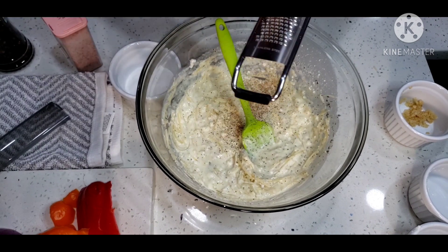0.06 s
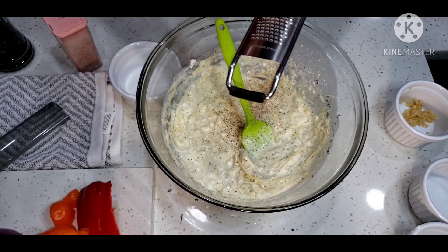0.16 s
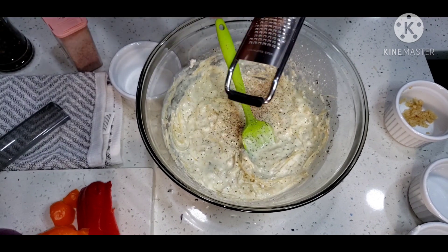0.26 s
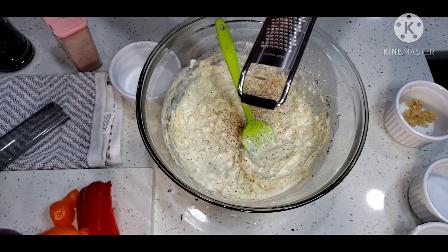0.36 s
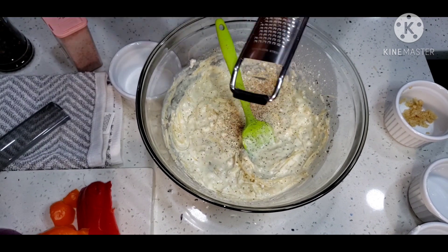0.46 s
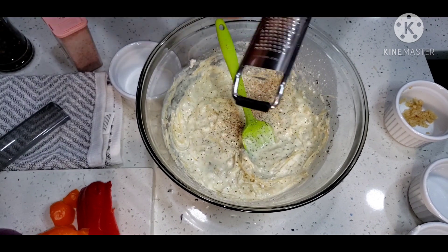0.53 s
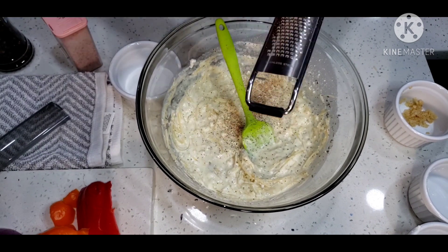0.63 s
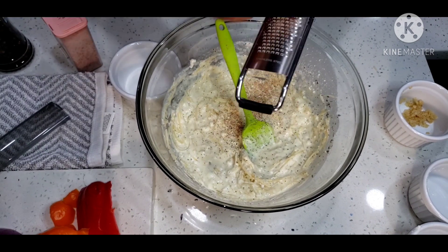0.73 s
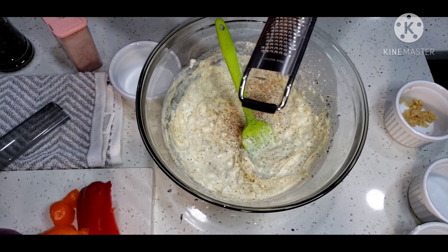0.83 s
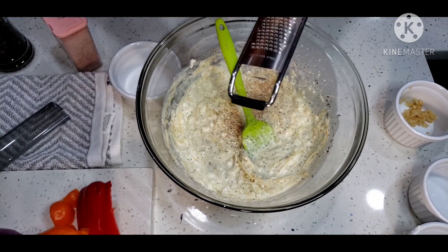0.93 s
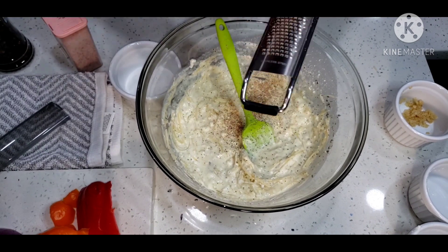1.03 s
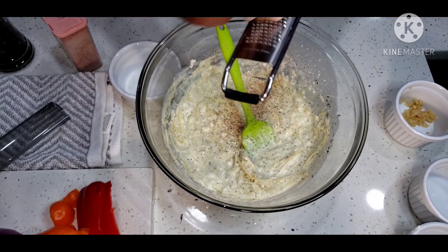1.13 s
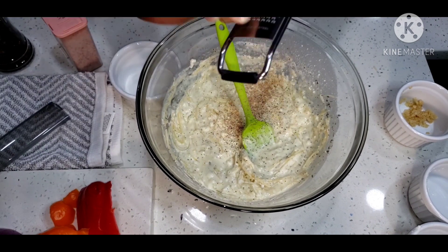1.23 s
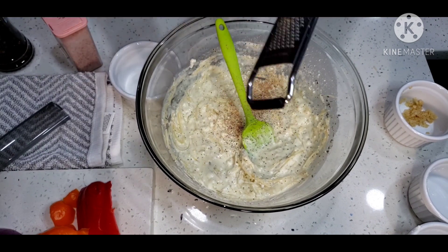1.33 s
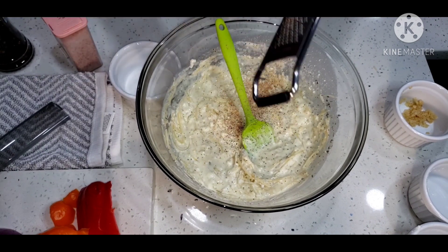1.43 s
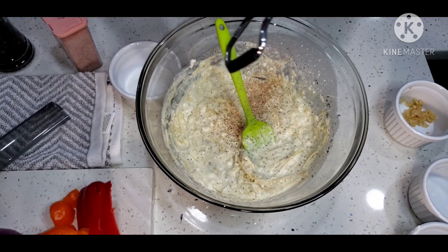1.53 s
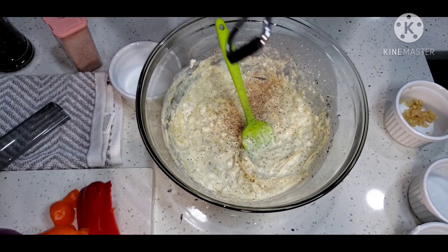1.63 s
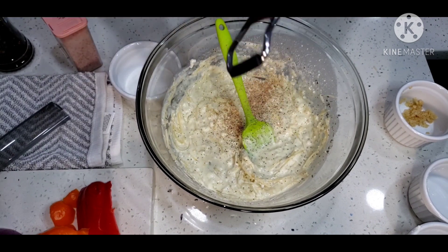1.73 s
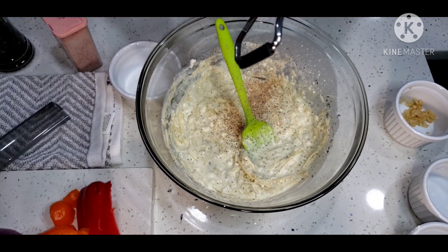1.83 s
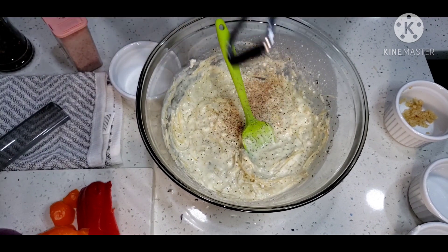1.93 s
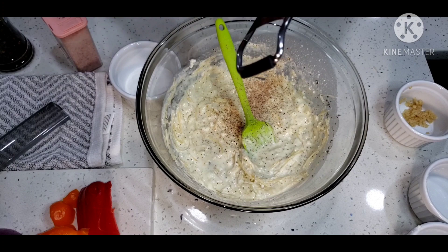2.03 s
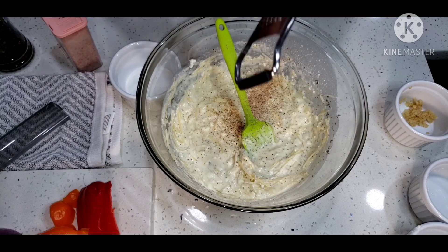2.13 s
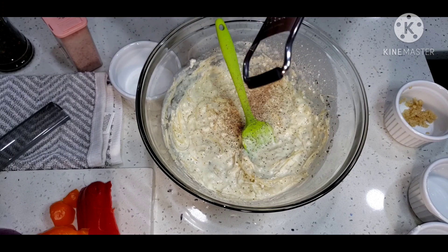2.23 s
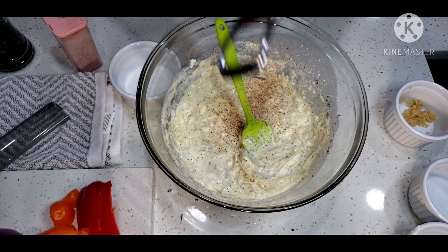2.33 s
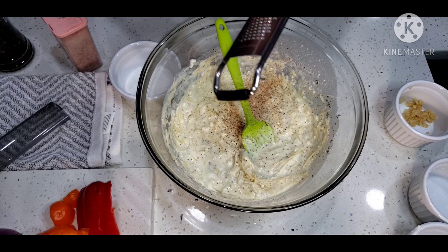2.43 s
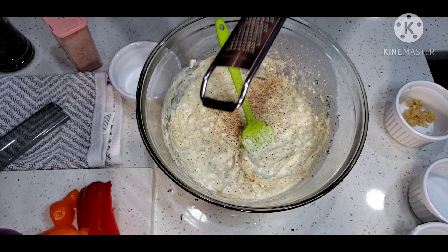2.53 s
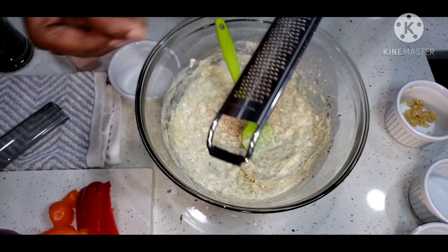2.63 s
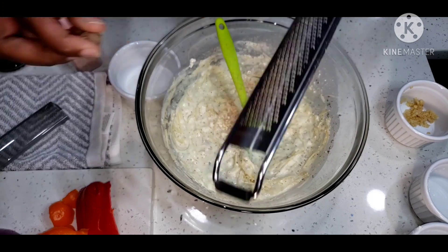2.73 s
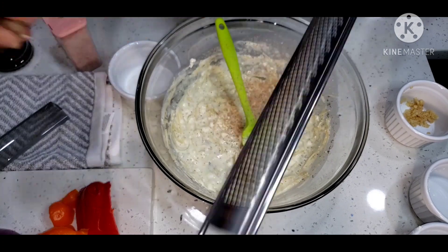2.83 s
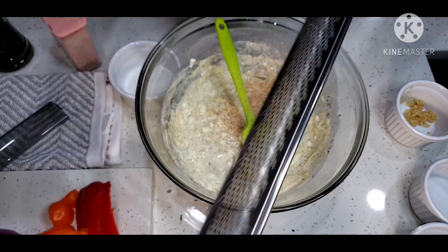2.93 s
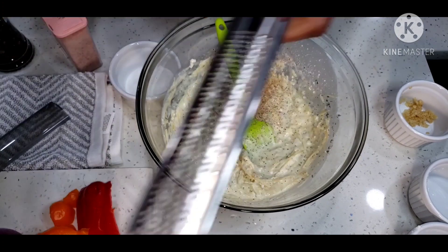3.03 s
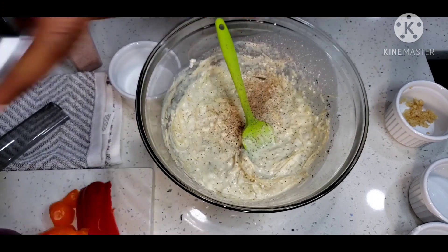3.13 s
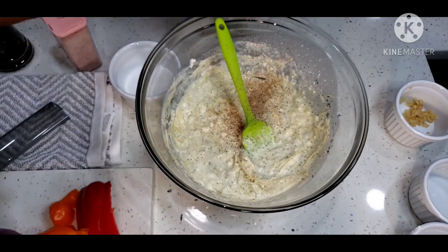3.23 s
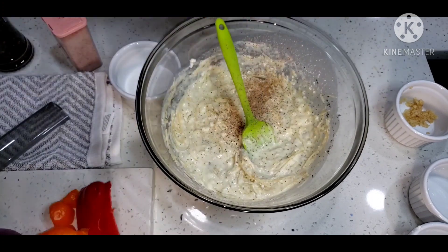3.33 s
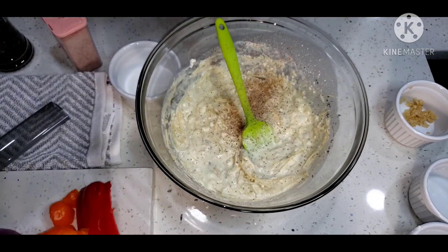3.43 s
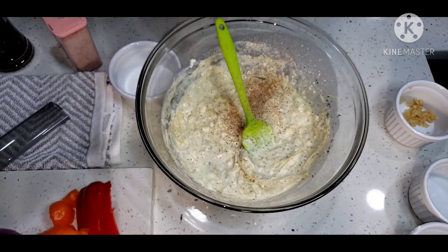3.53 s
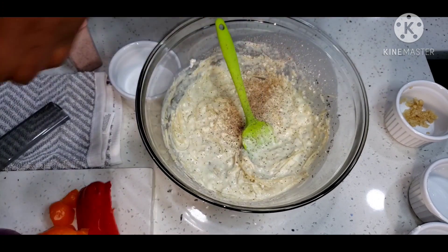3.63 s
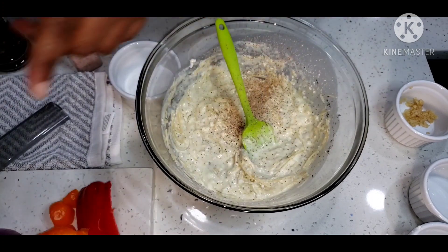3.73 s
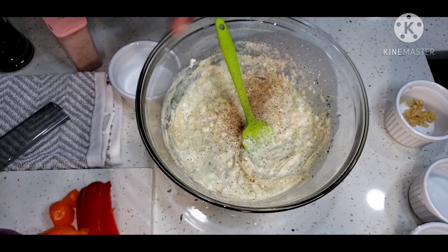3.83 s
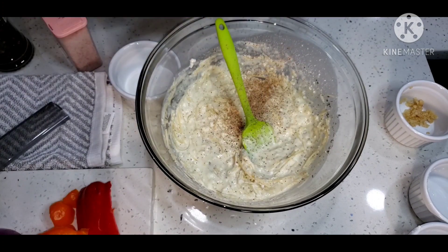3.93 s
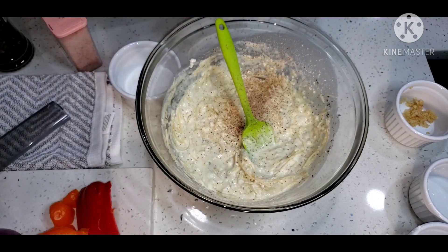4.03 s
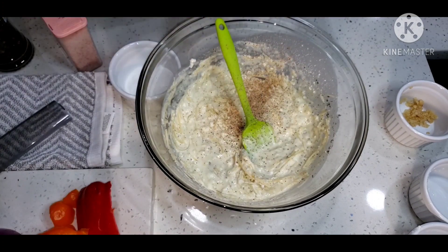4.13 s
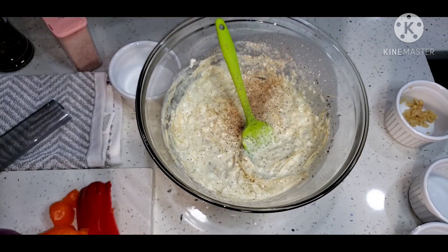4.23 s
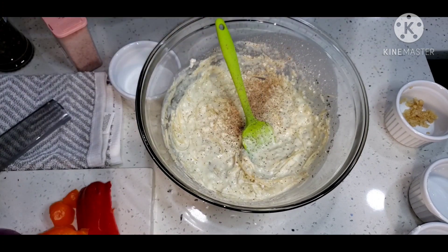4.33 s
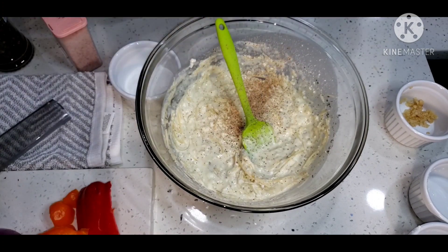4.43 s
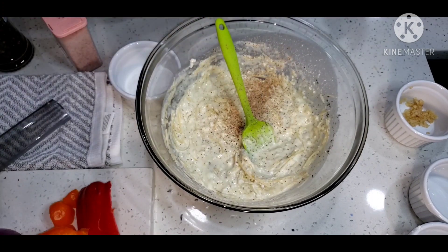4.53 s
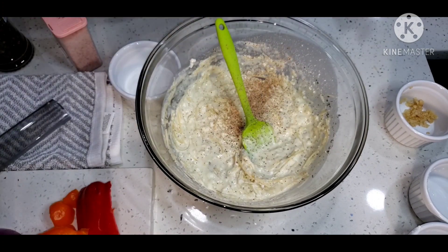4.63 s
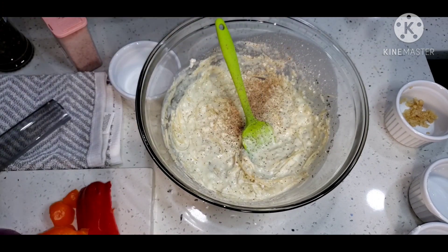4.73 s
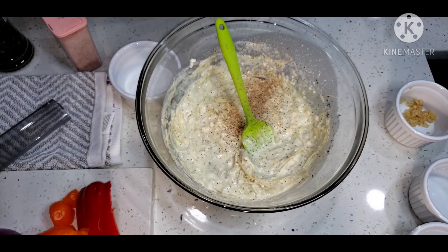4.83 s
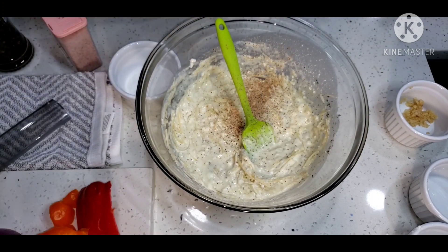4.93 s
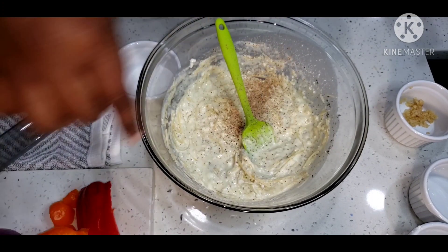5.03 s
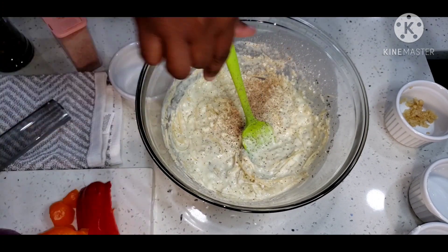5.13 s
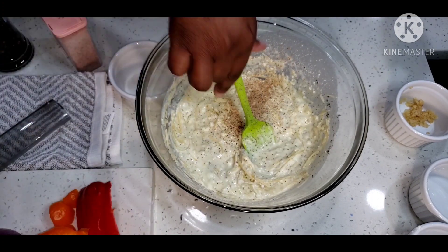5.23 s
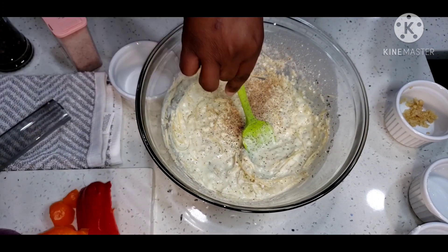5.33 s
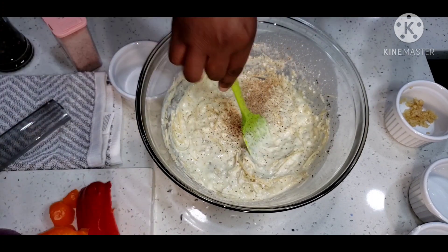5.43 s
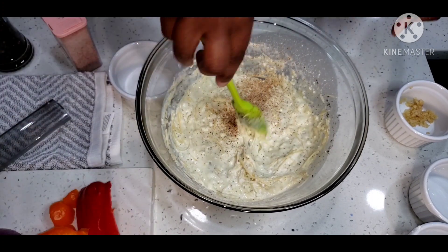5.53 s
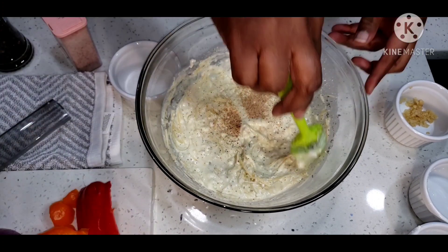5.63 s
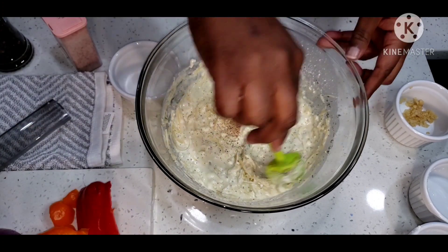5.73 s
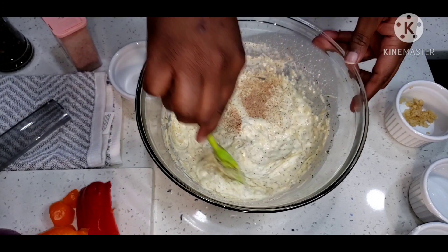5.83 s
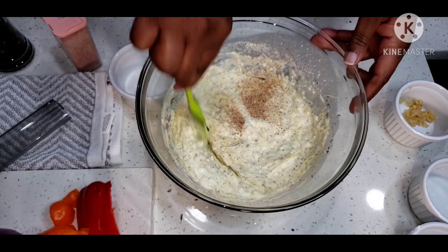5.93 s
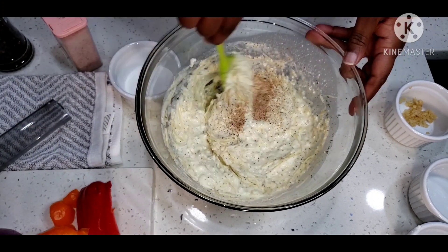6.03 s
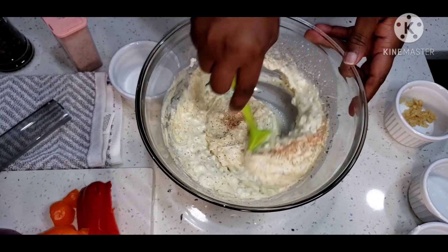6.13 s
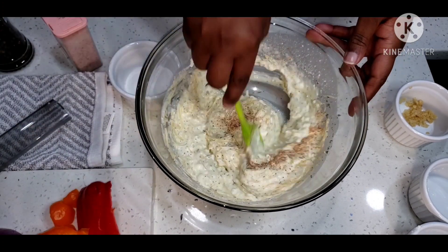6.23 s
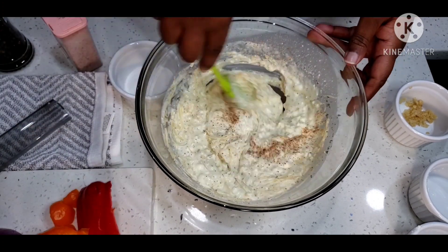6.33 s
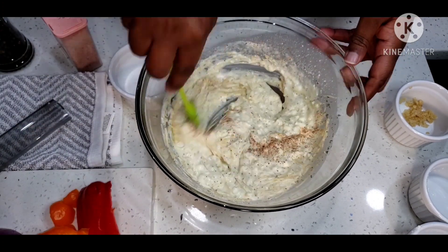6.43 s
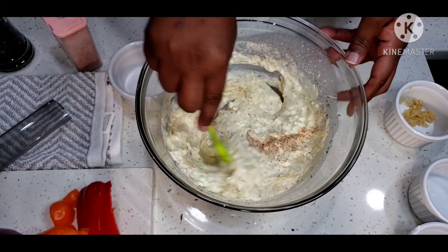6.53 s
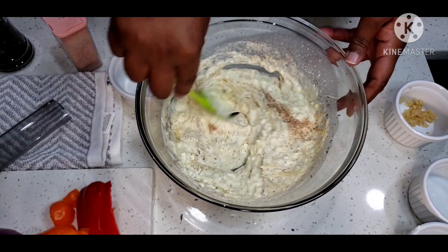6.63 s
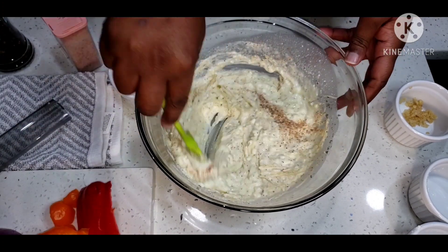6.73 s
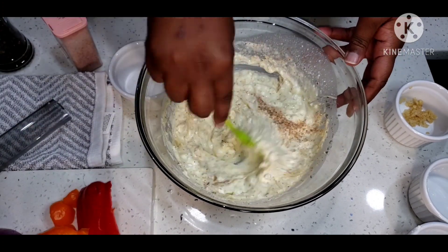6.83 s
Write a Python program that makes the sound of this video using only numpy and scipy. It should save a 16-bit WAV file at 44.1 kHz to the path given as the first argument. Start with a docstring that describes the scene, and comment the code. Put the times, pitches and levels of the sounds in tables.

```python
"""In a small hard kitchen where a fridge hums, a hard spice is rasped on a steel grater over a bowl.
The grater is tapped clean and dropped on a stone counter to the left, where it chatters and settles.
Then a spatula clicks and drags through batter. Rubbing is made of random tiny impacts, blows of noise
bursts that make the blade ring, clicks of short tones with a crack, and the hum of coloured noise."""
import sys
import numpy as np
from scipy import signal
from scipy.fft import rfft, irfft
from scipy.io import wavfile
from scipy.ndimage import uniform_filter1d

SR = 44100
rng = np.random.default_rng(int(sys.argv[2]) if len(sys.argv) > 2 else 0)


def put_to_file(sound):
    """Save the sound as 16-bit audio at rate SR, in the file named by the first command-line argument."""
    columns = np.atleast_2d(sound).T  # one column per channel
    safe = np.clip(columns, -1, 1)
    whole_steps = np.round(safe * 32767)
    wavfile.write(sys.argv[1], SR, whole_steps.astype(np.int16))


N = 303041

# Ringing modes of the blade while hand and spice damp it; levels are relative.
# Columns: pitch_hz [Hz], width_hz [Hz], level_db [dB]
DAMPED_MODES = [(418, 103, -2), (1164, 84, 3.5), (2133, 61, 8), (2790, 410, 3), (3460, 170, -4.5),
                (4670, 64, 1), (5830, 61, 8.5), (6404, 190, 7), (7450, 530, 1), (8550, 490, -2),
                (9750, 680, 0), (11200, 480, -4), (12300, 220, 0.5), (13440, 260, -1.5), (14360, 300, -2)]
PATCH = 4096  # samples set aside for each short burst, knock or click


def undb(db):
    """Turn decibels into a plain gain."""
    return 10 ** (np.asarray(db) / 20)


def unit(x):
    """Scale to unit energy along time."""
    return x / np.sqrt(np.sum(x ** 2, axis=-1, keepdims=True))


def sides(pan_db):
    """Left and right gains that differ by pan_db; positive leans left."""
    return undb(np.array([pan_db, -pan_db]) / 2)


def band(x, lo_hz, hi_hz):
    """Keep the sound between two pitches."""
    return signal.sosfilt(signal.butter(2, [lo_hz, hi_hz], "band", fs=SR, output="sos"), x)


def peak(x, hz, width_hz):
    """Let one mode ring: the wider its peak, the sooner it dies."""
    return signal.lfilter(*signal.iirpeak(hz, hz / width_hz, fs=SR), x)


def through(x, response):
    """Pass a sound through a body or room, given its answer to a single impact."""
    return signal.fftconvolve(x, response, axes=-1)[..., :N]


def colour(points, size=2048):
    """Short answer to an impact whose loudness over pitch follows (Hz, dB) points."""
    hz, db = np.transpose(points)
    grid_hz = np.arange(size + 1) * SR / 2 / size + 1
    curve_db = np.interp(np.log(grid_hz), np.log(hz), db)
    # folding the cepstrum forward puts the energy as early as possible
    cepstrum = irfft(np.log(undb(curve_db)))
    cepstrum[1:size] *= 2
    cepstrum[size + 1:] = 0
    return unit(irfft(np.exp(rfft(cepstrum)))[:size])


def body(points, modes, ring_db):
    """Answer to a blow, one for each side: a broad crack plus dying modes with their own phase on each side."""
    t = np.arange(SR // 2) / SR
    ring = 0
    for hz, db, t60 in modes:
        tone = np.sin(2 * np.pi * (hz * t + rng.random((2, 1))))
        ring = ring + undb(db - 60 * t / t60) / np.sqrt(t60) * tone
    out = undb(ring_db) * unit(ring)
    out[:, :2048] += colour(points)
    return unit(out)


def alike(shape):
    """Two noises under one envelope that agree most in the bass and differ in the treble."""
    alike_hz, own_bass = 2004, 0.68  # own_bass: share of separate noise left in the bass
    both = shape * rng.standard_normal(len(shape))
    own = shape * rng.standard_normal((2, len(shape)))
    low = signal.butter(1, alike_hz, fs=SR)
    bass = signal.lfilter(*low, both + own_bass * own)
    treble = own - signal.lfilter(*low, own)
    return bass + treble


def grains(gain, per_s, scatter_db):
    """Random one-sample impacts of spread but bounded size, each with its own random strength on each side."""
    size = np.minimum(rng.exponential(size=N), 3)
    impacts = (rng.random(N) < per_s / SR) * undb(scatter_db * size)
    return alike(gain * impacts / np.sqrt(np.mean(impacts ** 2)))


def tilt(x, low_db, top_db):
    """Raise or lower what lies under 3 kHz and over 9 kHz."""
    low = signal.lfilter(*signal.butter(2, 3000, fs=SR), x * (undb(low_db) - 1))
    top = signal.lfilter(*signal.butter(1, 9000, "high", fs=SR), x * (undb(top_db) - 1))
    return x + low + top


def hits(table):
    """Each contact is a short burst of noise; a longer contact dies more slowly."""
    out, t = np.zeros((2, N)), np.arange(PATCH) / SR
    for s, db, low_db, top_db, pan_db, contact, *_ in table:
        shape = np.exp(-2 * t / contact) * (1 - np.exp(-t / 0.002))
        burst = tilt(alike(shape), low_db, top_db)
        start = int(s * SR)
        out[:, start:start + PATCH] += undb(db) * sides(pan_db)[:, None] * burst
    return out


def wander(hz):
    """Random drift with spread 1, mostly between a third of hz and hz."""
    return unit(band(rng.standard_normal(N), hz / 3, hz)) * np.sqrt(N)


def swells(table):
    """One row of gain for each swell, with straight slopes in dB; also the time since its peak."""
    s, db, rise, fall = np.array(table)[:, :4].T[..., None]
    age = np.arange(N) / SR - s
    slope_db = 20 * np.where(age < 0, -age / rise, age / fall)
    return undb(db - slope_db), np.maximum(age, 0)


def placed(x, lag):
    """Delay the left by lag samples, or the right if lag is negative: sound reaches the nearer side first."""
    return np.array([np.roll(x[0], max(lag, 0)), np.roll(x[1], max(-lag, 0))])


def hum():
    """The fridge: broad noise with a few narrower, whistling bands."""
    # Colour of the broad noise; columns: pitch_hz [Hz], level_db [dB per Hz, relative]
    hum_colour = [(25, -8), (60, -0.5), (125, -0.5), (250, -7), (500, -9.5), (1000, -13.5), (1700, -18),
                  (1900, -27.5), (3500, -22), (6300, -16), (7600, -11.5), (8200, -21.5), (10000, -11.5),
                  (13000, -15.5), (16000, -16)]
    # Whistling bands; columns: pitch_hz [Hz], width_hz [Hz], level_db [dB, relative]
    whistles = [(1140, 56, 2.5), (1520, 50, 2.5), (7230, 150, -6), (9800, 550, -3), (10600, 120, -1)]
    level_db, pan_db = -65.5, 3.5
    noise = alike(np.ones(N))
    out = through(noise, colour(hum_colour)[None])
    for hz, width, db in whistles:
        out = out + undb(db) * peak(noise, hz, width)
    return out * undb(level_db) * sides(pan_db)[:, None]


def tail():
    """The room's answer builds up within a few ms and dies sooner in the treble."""
    # How fast each band dies; columns: pitch_hz [Hz], t60_s [s to fall 60 dB]
    room_bands = [(250, 0.67), (1000, 0.49), (4000, 0.38), (12000, 0.2)]
    t = np.arange(SR // 2) / SR
    out = 0
    for hz, t60 in room_bands:
        noise = band(rng.standard_normal((2, len(t))), hz / 2, min(hz * 2, 20000))
        out = out + noise * undb(-60 * t / t60)
    return unit(out * (1 - np.exp(-t / 0.00049)))


def spatula():
    """Short damped clicks with a broad crack, over a wet grainy drag and dull rubbing on the bowl."""
    # Small clicks of the settling blade, spatula and batter; levels are relative. Columns: start_s [s],
    # level_db [dB], pitch_hz [Hz], ring_s [s to fall 60 dB], left_minus_right_db [dB], crack_db [dB]
    clicks = [(3.25, -52.5, 520, 0.012, 18, -4), (3.297, -48, 2950, 0.0076, 16, 4),
              (3.332, -52.5, 6450, 0.0068, 7, 9), (3.352, -49, 6930, 0.0083, 8, 1),
              (3.394, -50.5, 2280, 0.034, 13, 4.5), (4.011, -34, 2690, 0.0088, 13, -9),
              (4.031, -31.5, 2280, 0.012, 12, -5), (4.732, -51.5, 760, 0.022, 19, -7),
              (4.762, -47, 3430, 0.01, 16, -10), (4.776, -49, 4000, 0.018, 14, -7),
              (5.353, -55.5, 950, 0.014, 10.5, -3), (5.384, -51, 980, 0.015, 9.5, -22),
              (5.88, -50, 960, 0.02, 12.5, -0.5), (5.947, -48, 970, 0.0087, 9, 1),
              (5.962, -50, 2200, 0.0067, 13, -4), (5.974, -51, 573, 0.011, -1, 8),
              (6.015, -56, 732, 0.0058, 6, 16.5), (6.065, -56, 2000, 0.005, 6, 5),
              (6.117, -51.5, 9800, 0.006, 7, 3.5), (6.131, -46, 4850, 0.015, 8, -7),
              (6.001, -55, 1200, 0.008, 7, 4), (6.354, -33, 1470, 0.012, 11, -11),
              (6.371, -47, 1730, 0.027, 6, 4.5), (6.493, -32, 2640, 0.0029, 9.5, 7),
              (6.533, -33, 2620, 0.0055, 3, 0), (6.577, -47, 1560, 0.023, 11, 4),
              (6.621, -45, 602, 0.068, 13.5, -11), (6.643, -39, 1100, 0.01, 12, -8),
              (6.654, -39, 6500, 0.0069, 12, 2), (6.665, -47, 563, 0.014, 8, -13),
              (6.691, -47.5, 668, 0.014, 6, 8), (6.799, -31, 6940, 0.008, 11.5, -3),
              (6.861, -33, 655, 0.04, 6, -16), (6.862, -38, 1540, 0.03, 10, -20)]
    # The spatula bites and drags on; rise and fall span 20 dB, levels are relative.
    # Columns: peak_s [s], grit_db [dB], rise_s [s], fall_s [s], rub_db [dB]
    drags = [(5.37, -80, 0.03, 0.3, -62.5), (5.886, -65, 0.015, 0.32, -55), (6.01, -58.5, 0.27, 0.35, -74),
             (6.118, -62.5, 0.028, 0.2, -77), (6.364, -52.5, 0.054, 0.19, -65.5),
             (6.493, -39.5, 0.014, 0.086, -53.5), (6.645, -53, 0.076, 0.23, -54.5),
             (6.799, -49, 0.0073, 0.039, -53), (6.83, -54.5, 0.039, 0.22, -63)]
    drag_pan_db, rub_scatter_db, attack_s = 4, 4, 0.00014
    out, t = np.zeros((2, N + PATCH)), np.arange(PATCH) / SR
    for s, db, hz, ring, pan_db, crack_db in clicks:
        crack = undb(crack_db) * band(alike(np.exp(-t / 0.0017)), 2230, 21000)
        tone = undb(-60 * t / ring) * np.sin(2 * np.pi * hz * t)
        click = (tone + crack) * (1 - np.exp(-t / attack_s))
        start = int(s * SR)
        out[:, start:start + PATCH] += undb(db) * sides(pan_db)[:, None] * click
    each, _ = swells(drags)
    _, grit_db, _, _, rub_db = np.array(drags).T
    grit_gain, rub_gain = each.sum(0), undb(rub_db - grit_db) @ each
    grit = undb(-3.0) * band(grains(grit_gain, 2200, 4), 2300, 20000)
    dull = band(grains(rub_gain, 2000, rub_scatter_db), 300, 1520)
    rub = undb(9.5) * band(dull, 300, 1520)  # filtered twice for steeper edges
    return band(out[:, :N], 520, 19000) + sides(drag_pan_db)[:, None] * (grit + rub)


def taps():
    """A fingertip knocks the dust off the held blade; a short knock has the pitch of the spot that is hit."""
    # Finger taps; levels are relative. Columns: start_s [s], level_db [dB], low_db [dB], top_db [dB],
    # left_minus_right_db [dB], contact_s [s], knock_hz [Hz], knock_db [dB]
    finger_taps = [(1.5092, -24.5, -13, -2, 4.5, 0.019, 2090, -42),
                   (1.718, -22.5, -16, -1.5, 4.5, 0.013, 2000, -37),
                   (1.928, -31, -3, -3.5, 6.5, 0.009, 1150, -50),
                   (2.139, -32, -1, 0.5, 5.5, 0.013, 1210, -39),
                   (2.359, -26.5, -1.5, 3.5, 5.5, 0.0083, 1285, -30.5)]
    # Colour of the crack; columns: pitch_hz [Hz], level_db [dB per Hz, relative]
    tap_colour = [(120, -46), (200, -25), (480, -22.5), (909, -6), (2010, -4.5), (2860, -7), (3190, -4.5),
                  (5350, -5), (6320, 2.5), (8180, -2), (13700, 7.5), (15600, 4.5), (16500, -30)]
    ring_db, knock_t60_s = -19, 0.015
    # a mode's width sets how long it rings
    modes = [(hz, db, np.log(1000) / np.pi / width) for hz, width, db in DAMPED_MODES]
    out = undb(3.0) * through(hits(finger_taps), body(tap_colour, modes, ring_db))
    t = np.arange(PATCH) / SR
    for s, _, _, _, pan_db, _, hz, db in finger_taps:
        shape = undb(db - 60 * t / knock_t60_s) * (1 - np.exp(-t / 0.0018))
        knock = shape * np.sin(2 * np.pi * hz * t)
        start = int(s * SR)
        out[:, start:start + PATCH] += sides(pan_db)[:, None] * knock
    return out


def counter():
    """Blows, brushes and slides make the free blade ring as it chatters unevenly against the stone."""
    # Blows of the blade on the counter; levels are relative. Columns: start_s [s], level_db [dB],
    # low_db [dB], top_db [dB], left_minus_right_db [dB], contact_s [s]
    blows = [(3.7454, -12.5, 2.5, 18, 6.5, 0.0043), (3.7514, -22, -18, -34, 8, 0.0036),
             (3.8008, -7, -2, -17, 3.4, 0.0026), (4.0464, -31.5, -13, -25.5, 9.9, 0.004),
             (4.0741, -34.5, -6, -23, 11, 0.008), (4.0834, -49, -20, -24, 7.4, 0.0042),
             (4.2383, -10.5, -1.5, 3, 21, 0.0051), (4.2894, -2, -30, -19, 9, 0.0026),
             (4.3335, -8.5, -25, -20, 5, 0.0041), (4.6344, -52.5, 8.5, -17, 29, 0.0084)]
    # The blade brushes, chatters and slides; rise and fall span 20 dB, levels are relative.
    # Columns: peak_s [s], level_db [dB], rise_s [s], fall_s [s], low_db [dB], top_db [dB]
    slides = [(3.027, -60, 0.027, 0.037, -13, 23), (3.09, -63, 0.041, 0.22, -2, -2.5),
              (3.296, -59, 0.06, 0.15, -2.5, -2), (3.41, -64.5, 0.045, 0.32, 1.5, 6.5),
              (3.751, -26.5, 0.0034, 0.035, 5, 13), (3.804, -30.5, 0.006, 0.022, 9, 4),
              (3.83, -43.5, 0.042, 0.14, 5, 1), (4.08, -52, 0.12, 0.039, 16, -9),
              (4.244, -22.5, 0.003, 0.083, 1, -5), (4.354, -31.5, 0.081, 0.048, 4, -28),
              (4.43, -69, 0.03, 0.3, 20.5, -14), (4.62, -54.5, 0.015, 0.11, 4, -3),
              (4.763, -61, 0.033, 0.078, 9.5, -12), (4.89, -70.5, 0.11, 0.067, 8, 19.5)]
    # Colour of the crack; columns: pitch_hz [Hz], level_db [dB per Hz, relative]
    blow_colour = [(59, -45), (100, -23.5), (230, -21.5), (437, -22), (761, -4), (903, -14.5), (1440, -15),
                   (2570, -12), (3320, -15), (4120, -15.5), (6310, -6), (7980, -14.5), (13900, -11),
                   (15500, -20.5), (16500, -78.5)]
    # Modes of the free blade; columns: pitch_hz [Hz], level_db [dB, relative], t60_s [s to fall 60 dB]
    free_modes = [(664.9, 2, 0.48), (704, -3, .1), (748, 0.5, 0.081), (812, -3, 0.087), (870, -9, 0.04),
                  (1016, -1.5, 0.061), (1067, -11, 0.068), (1206, -17, .08), (2998, 1.5, 0.11),
                  (3275, 2.5, 0.06), (3444, 5, 0.07), (4040, -13, 0.058), (5020, 3.5, .035),
                  (5665, -14, .12), (5915, -2, 0.17), (6450, 6.5, 0.063), (6535, -14, .15), (6900, 7, 0.13),
                  (7450, 4, 0.024), (9000, 6, 0.0817), (10020, 5.5, 0.057)]
    ring_db, slide_pan_db = -6, 7.5
    chatter_hz, chatter_depth, chatter_scatter_db = 75, 0.41, 2  # the rate is an average
    dulling_db_per_s = 56  # treble lost as a slide dies
    each, age = swells(slides)
    gain = each.sum(0)
    share = each / (gain + 1e-12)  # how much each slide counts at each moment
    _, _, _, _, slide_low_db, slide_top_db = np.array(slides).T
    low_db = slide_low_db @ share
    top_db = slide_top_db @ share - dulling_db_per_s * (share * age).sum(0)
    wobble = uniform_filter1d(rng.standard_normal(N), size=900) * 30  # spread 1
    phase = np.cumsum(chatter_hz * (1 + 0.21 * wobble)) / SR % 1
    pulse = 1 - chatter_depth + 2 * chatter_depth * np.exp(-phase / 0.071)
    chatter = grains(gain * pulse, 6000, chatter_scatter_db)
    slide = undb(2.5) * sides(slide_pan_db)[:, None] * tilt(chatter, low_db, top_db)
    return through(slide + undb(-4) * hits(blows), body(blow_colour, free_modes, ring_db))


def pressure():
    """Each stroke is an arch: slow at the turns, hardest near the middle."""
    # Strokes, in turn a light pull back and a hard push.
    # Columns: start_s [s], length_s [s], level_db [dB, relative]
    strokes = [(-0.03, 0.17, -37.5), (0.131, 0.14, -28.5), (0.245, 0.12, -38), (0.371, 0.13, -28.5),
               (0.49, 0.12, -34.5), (0.608, 0.14, -28.5), (0.736, 0.14, -39), (0.863, 0.14, -29),
               (0.98, 0.13, -40.5), (1.097, 0.18, -28)]
    arch_power, arch_lean = 1.97, 0.99  # how pointed the arch is; how late its top comes
    contact_db = -56.5  # spice resting on the teeth, until the last stroke ends
    t, gain = np.arange(N) / SR, 0
    for s, length, db in strokes:
        progress = np.clip((t - s) / length, 0, 1)
        gain = gain + undb(db) * np.abs(np.sin(np.pi * progress ** arch_lean)) ** arch_power
    return gain + undb(contact_db) * (t < s + length)


def rasp():
    """Thousands of teeth a second bite the spice; the spot that it touches decides which blade modes ring."""
    # Colour of the bites; columns: pitch_hz [Hz], level_db [dB per Hz, relative]
    rasp_colour = [(47, -29), (80, -24.5), (261, -24.5), (426, -22.5), (972, -21), (1160, -15.5),
                   (1740, -14), (2120, -15), (2320, -18.5), (4050, -6), (6050, -1), (8080, -5.5),
                   (14100, 6), (15400, 4.5), (16500, -48)]
    teeth_per_s, tooth_scatter_db, pan_db = 7000, 1.6, 3.5
    catch_hz, catch_db = 220, 1.5  # rows of teeth catch and let go
    spot_hz, spot_db = 14, 3  # how fast and how far each mode's drive changes as the spice travels
    body_db, body_slope = 5.5, 0.15  # low body on a hard push; dB gained per dB of lighter pressure
    gain = pressure()
    low_db = body_db - body_slope * 20 * np.log10(gain / gain.max() + 1e-3)
    teeth = grains(gain * undb(catch_db * wander(catch_hz)), teeth_per_s, tooth_scatter_db)
    teeth = through(tilt(teeth, low_db, 0), colour(rasp_colour)[None])
    ring = 0
    for hz, width, db in DAMPED_MODES:
        drive = teeth * undb(db + spot_db * wander(spot_hz))
        ring = ring + peak(drive, hz, width)
    return undb(-3.0) * sides(pan_db)[:, None] * (teeth + ring)


def scene():
    """Place the sources, let the room answer each in its own share, and add the hum."""
    # each source with the samples by which left lags right, and its room share in dB
    parts = [(hum_free, lag, room_db) for hum_free, lag, room_db in (
        (rasp(), 3, -8), (taps(), 3, -3), (counter(), -15, -7.5),
        (spatula(), 3, -11))]  # the spatula is near, so it has the least room
    direct, to_room = 0, 0
    for sound, lag, room_db in parts:
        source = placed(sound, lag)
        direct = direct + source
        to_room = to_room + undb(room_db) * source
    return direct + through(to_room, tail()) + hum()


def record(dry):
    """The deepest bass is lost; the top is shelved down, then cut."""
    shelf_hz, top_hz = 15500, 16750
    soft = signal.sosfilt(signal.butter(2, 40, "high", fs=SR, output="sos"), dry)
    soft = signal.sosfilt(signal.ellip(6, .2, 24, shelf_hz, fs=SR, output="sos"), soft)
    return signal.sosfilt(signal.ellip(10, .2, 70, top_hz, fs=SR, output="sos"), soft)


dry = scene()
out = record(dry)
put_to_file(out)
```